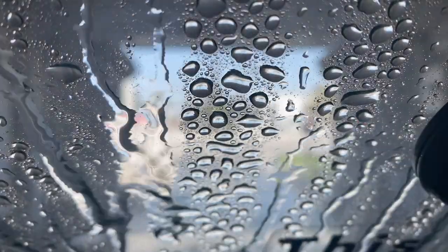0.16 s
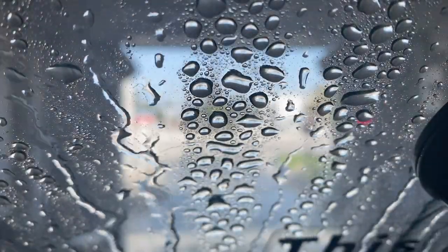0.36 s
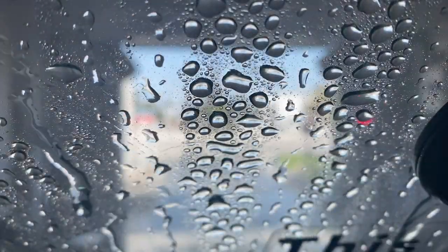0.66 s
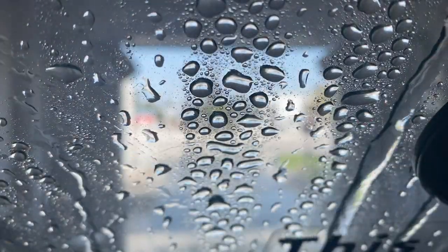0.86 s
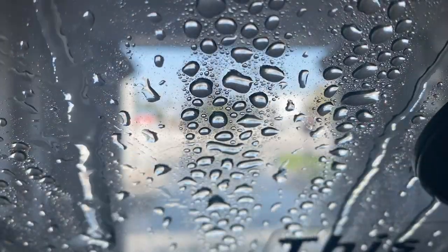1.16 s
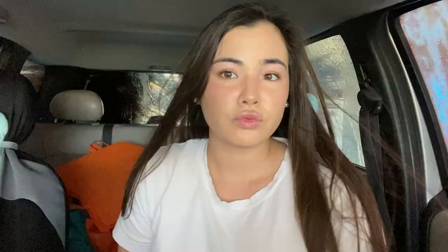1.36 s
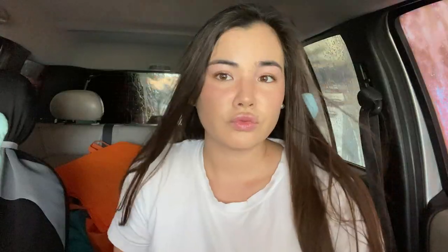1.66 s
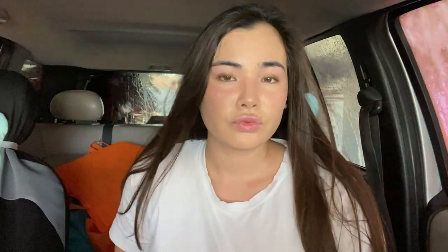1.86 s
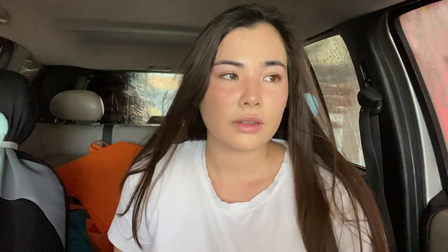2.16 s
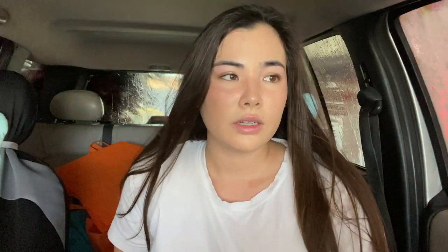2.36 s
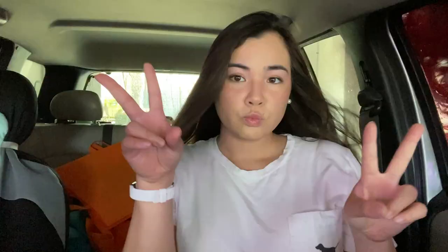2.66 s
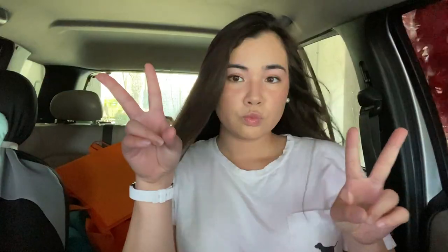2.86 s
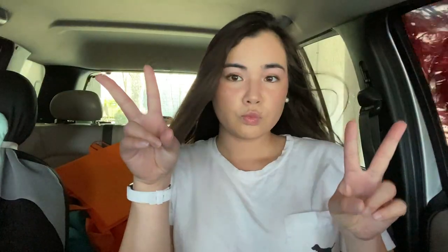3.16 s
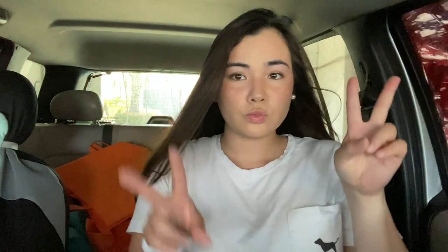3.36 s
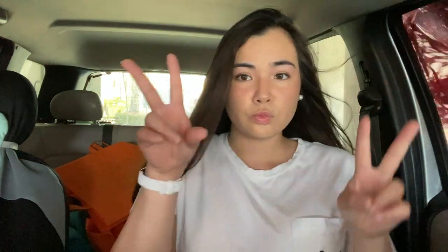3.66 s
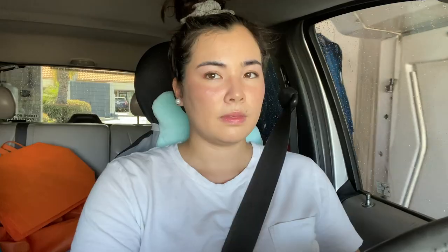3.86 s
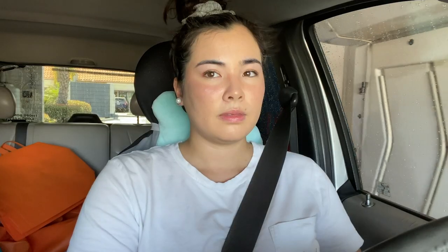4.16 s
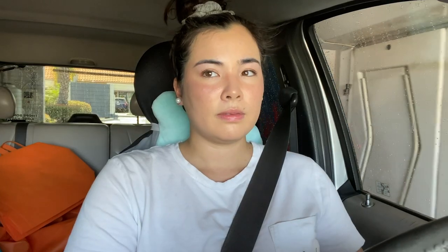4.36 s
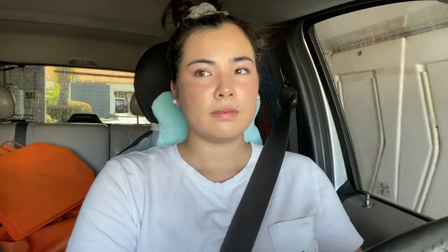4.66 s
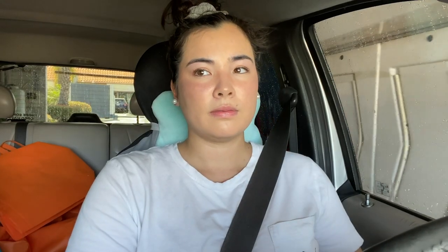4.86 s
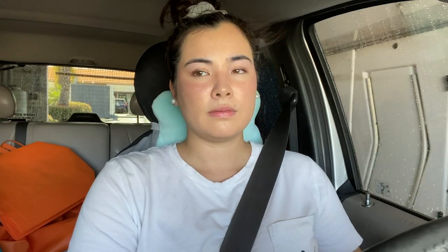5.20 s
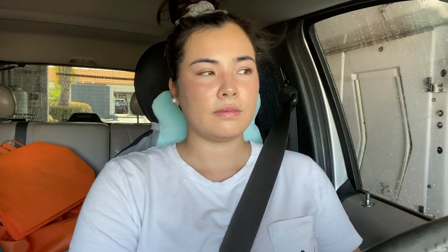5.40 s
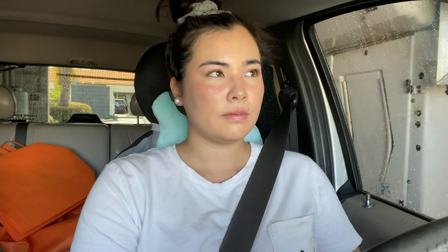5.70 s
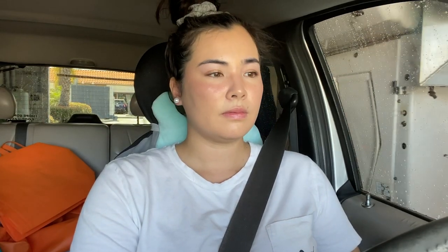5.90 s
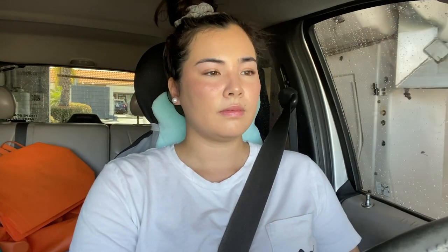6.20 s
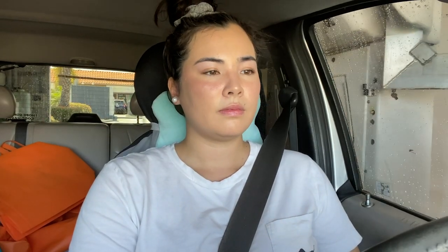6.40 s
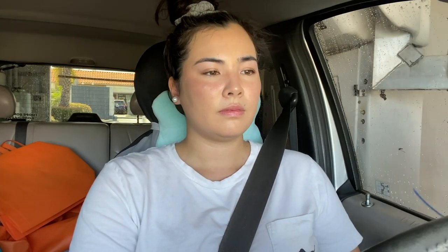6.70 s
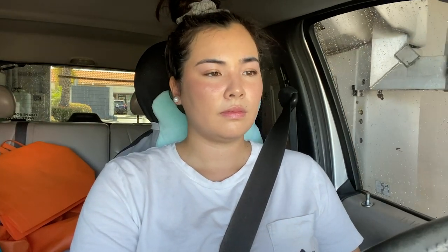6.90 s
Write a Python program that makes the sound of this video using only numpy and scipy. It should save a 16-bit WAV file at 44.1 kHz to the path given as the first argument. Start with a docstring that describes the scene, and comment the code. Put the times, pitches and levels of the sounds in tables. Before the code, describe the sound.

Inside a car in an automatic wash: water sputters on the windscreen, foam drums, a wet brush slaps, then motors hum and whine.

```python
"""Inside a car in an automatic car wash, four stages follow each other abruptly.
Water trickles and sputters on the windscreen: shaped noise pulsed by the nozzle, over a rumbling bay.
Foam drums on the panels and spatters on the glass: grainy noise, noise bursts and tiny ringing droplets.
A wet brush slaps the side window with noise bursts and shakes the body with short low waves.
Then only the motors are heard: beating sine waves, ringing noise, a howl and a whine."""
import sys
import numpy as np
from scipy import signal
from scipy.fft import rfft, irfft
from scipy.io import wavfile
from scipy.ndimage import uniform_filter1d

SR = 44100
rng = np.random.default_rng(int(sys.argv[2]) if len(sys.argv) > 2 else 0)


def log_audio(samples):
    """Write samples as a 16-bit WAV file to the path given in sys.argv[1]."""
    # one column per channel
    frames = np.atleast_2d(samples).T
    # limit to full scale, then quantise
    limited = np.clip(frames, -1, 1)
    pcm = np.round(limited * 32767).astype(np.int16)
    wavfile.write(sys.argv[1], SR, pcm)


N = 310464
TIME = np.arange(N) / SR
FREQ = np.maximum(np.arange(N // 2 + 1) * SR / N, 1)  # in Hz; at least 1 to avoid dividing by zero

# when each later stage begins, in seconds
FOAM_S, BRUSH_S, MOTORS_S = 1.428, 2.729, 3.858

# colour of each kind of noise, before its own level changes: pitch_hz, level_db_per_hz
BAY_COLOUR = [(25, -67), (40, -51.5), (58, -43), (120, -49), (160, -53), (210, -57), (400, -54.5),
              (650, -64.5), (900, -66.5), (1300, -72.5), (1900, -74.5), (3000, -84.5), (4800, -82.5),
              (15000, -100.5)]
FOAM_COLOUR = [(25, -58), (55, -42.5), (130, -44), (200, -38.5), (290, -48), (400, -40.5), (600, -50),
               (900, -49.5), (1150, -55.5), (1600, -61.5), (2700, -63.5), (4500, -67.5), (8000, -77),
               (10500, -86), (15000, -94)]
BRUSH_COLOUR = [(25, -66.5), (40, -39), (57, -35), (115, -38), (200, -43.5), (380, -46), (600, -50.5),
                (900, -51.5), (1400, -54.5), (2500, -60), (4700, -60.5), (6300, -69.5), (10500, -78),
                (15000, -89)]
DRONE_COLOUR = [(25, -61), (40, -48), (52, -45), (85, -42.5), (140, -48.5), (210, -46), (280, -47.5),
                (380, -46), (650, -57.5), (950, -59), (1450, -66.5), (2500, -72), (4500, -81),
                (6200, -90.5), (8200, -92), (10700, -108), (12800, -102), (15000, -106)]
SPLASH_COLOUR = [(1000, -65.5), (2000, -74), (4000, -75), (7000, -75.5), (11000, -79.5), (15000, -78.5)]

# how alike left and right are, below the top treble: pitch_hz, correlation (-1 to 1)
FRONT_LIKENESS = [(60, 1), (130, 0.8), (290, 0.74), (640, -0.1), (1600, -0.26), (2100, 0.2), (4000, 0.3),
                  (6820, 0.23)]
FOAM_LIKENESS = [(60, 0.94), (150, 0.54), (400, 0.31), (600, -0.35), (900, 0.26), (1150, -0.24),
                 (2100, -0.19), (6800, -0.11)]
BRUSH_LIKENESS = [(60, 0.86), (150, 0.47), (290, 0.37), (540, -0.41), (950, -0.44), (1200, -0.72),
                  (1700, -0.37), (2000, 0.065), (2450, 0.65), (3500, -0.41), (6800, 0.072)]
MOTOR_LIKENESS = [(60, 0.97), (250, 0.77), (510, -0.29), (850, -0.14), (1300, -0.31), (1550, -0.54),
                  (1760, -0.075), (1930, 0.15), (3300, -0.11), (6800, 0.14)]
# left-right balance added in the cabin: pitch_hz, left_minus_right_db
CABIN_BALANCE = [(60, -1.5), (110, -3), (200, -3.5), (380, -3), (700, -2.5), (1290, -0.5), (2380, 0.5),
                 (4400, -0.5), (8120, -0.5), (15000, -1)]

# motor hum above the shaft rate: multiple (of the shaft rate), level_db (before it wanders)
HUM_OVERTONES = [(2, -30), (3, -33.5)]
# first motor's hum over time: time_s, level_db
HUM_LEVEL = [(3.86, -32), (4.33, -21), (4.62, -23.5), (4.95, -27), (5.42, -27), (5.62, -21.5), (5.95, -28),
             (6.23, -23.5), (7.04, -24.5)]
# narrow resonances of the running machinery: pitch_hz, width_hz, level_db (before it wanders)
MACHINE_RINGS = [(209.5, 55, -32.5), (481, 133, -30), (1950, 140, -46), (2067, 80, -49.5),
                 (4870, 300, -62.5)]
# rises and dips of the whine: crest_s, change_db
SURGES = [(4.58, 5.5), (5.03, 6), (5.28, -1), (5.69, 7), (5.98, 3), (6.17, 5.5), (6.67, 4)]
# rises of the machinery's howl: crest_s, change_db
HOWLS = [(4.0, 5.5), (4.29, 6), (4.71, 4), (5.09, 13), (5.77, 5), (6.7, 7)]

# panels and fittings that ring under the rinse: pitch_hz, width_hz, level_db
BAY_RINGS = [(209.2, 20, -36), (902, 110, -45), (1747, 110, -52.5), (4000, 110, -57), (4800, 190, -57)]
# loose water that gushes over the windscreen: crest_s, level_db, rise_s, fall_s
GUSHES = [(.918, 0.5, .004, .015), (.946, 1.5, .012, .007), (1.185, -8.5, 0.011, 0.055),
          (1.27, -1, 0.036, 0.069)]
# single drops and knocks on the car: start_s, level_db (before the ring's envelope), pitch_hz, width_hz, decay_s
DROPS = [(0.469, -13.5, 254, 50, 0.017), (0.634, -20.5, 350, 181, 0.02), (0.676, -20, 3530, 1150, 0.003),
         (.783, -24.5, 1800, 600, 0.0092), (0.782, -6.5, 113.6, 29.8, 0.032),
         (.914, -31, 4300, 2500, 0.008), (0.9375, -27.5, 2320, 300, .008), (.946, -36, 3500, 1200, .005),
         (.947, -29, 1870, 70, 0.017), (4.2018, -22, 7200, 5200, 0.0066), (4.202, -19, 2230, 1000, 0.0067),
         (5.445, -41, 14000, 2500, 0.0072), (5.639, -44, 12900, 4000, 0.0056),
         (6.265, -46, 12900, 800, .012), (6.97, -47, 13000, 4000, .006)]

# moments when the water swings off the glass: time_s, change_db
LULLS = [(1.783, -12), (1.884, -7), (1.985, -8.5), (2.216, -6.5), (2.347, -8), (2.53, -7.5), (2.675, -15),
         (2.886, -8.5), (3.008, -6.5), (3.075, -7), (3.401, -5.5), (3.562, -10.5), (3.718, -12.5)]
# modes of the wet side window: pitch_hz, width_hz, boost_db (before an overall trim)
WINDOW_MODES = [(1930, 39, 2), (2210, 39, -2.5), (2490, 55, 3), (2890, 50, 1.5), (3270, 44, 4),
                (4360, 290, 2)]
# clots of foam that thump the panels: crest_s, change_db
THUMPS = [(1.434, 1.5), (1.504, -0.5), (1.571, 2.5), (1.634, 2), (1.667, 1.5), (1.708, 2.5), (1.766, 4.5),
          (1.809, 1.5), (1.866, 6), (1.924, 2), (1.96, 2.5), (2.019, 3.5), (2.1, 3), (2.172, 8),
          (2.257, 5.5), (2.328, 6), (2.388, -1), (2.449, 1.5), (2.532, 6), (2.576, 8.5), (2.64, 3.5),
          (2.71, 4.5)]
# narrow ring of the panels under the foam: pitch_hz, width_hz, level_db (before it drums)
PANEL_RINGS = [(398, 48, -25.5), (700, 24, -32.5)]
# gobs of foam that spatter on the glass: crest_s, level_db, centre_hz
SPATTERS = [(1.431, -27.5, 3000), (1.488, -25, 3600), (1.539, -25.5, 3370), (1.595, -26, 3200),
            (1.633, -28, 3300), (1.698, -26, 2900), (1.721, -24.5, 3100), (1.825, -25.5, 2900),
            (1.865, -29, 2700), (1.9, -23.5, 3400), (1.935, -35, 2900), (2.021, -23, 3370),
            (2.052, -22.5, 3470), (2.104, -23, 3120), (2.137, -23, 2200), (2.165, -20, 3030),
            (2.247, -27, 3000), (2.297, -23.5, 3580), (2.359, -26.5, 3800), (2.438, -26, 2800),
            (2.471, -26.5, 3900), (2.579, -18, 3300), (2.621, -25, 3500), (2.701, -24, 3600)]
# the jet of foam first strikes the car: crest_s, level_db, centre_hz
JET_STRIKE = [(1.4288, -15, 520)]
# strips of the brush that slap the glass: crest_s, level_db (before a small trim), centre_hz
SLAPS = [(2.7305, -21, 3200), (2.738, -19, 3000), (2.751, -16, 2500), (2.8515, -16.5, 2880),
         (2.895, -19, 2920), (2.903, -16, 2720), (2.923, -21.5, 2500), (2.952, -27, 2100),
         (3.0162, -19, 3020), (3.1085, -15.5, 3470), (3.1165, -21, 2400), (3.145, -20, 3100),
         (3.179, -19, 3100), (3.204, -18, 3000), (3.226, -19, 4000), (3.246, -10.5, 2170),
         (3.277, -11, 2600), (3.285, -15.5, 3200), (3.298, -25, 2880), (3.337, -26, 2900),
         (3.37, -18, 3000), (3.378, -11.5, 2930), (3.4523, -13, 2600), (3.4677, -15, 2500),
         (3.48, -19, 3100), (3.501, -19, 2600), (3.5196, -14, 3000), (3.583, -16.5, 2900),
         (3.59, -19, 2500), (3.609, -29, 3900), (3.638, -21, 2200), (3.6694, -20, 3300), (3.68, -21, 3700),
         (3.702, -14.5, 1900), (3.733, -18.5, 3300), (3.798, -20, 3200), (3.832, -19.5, 2780)]
# the brush bumps the body of the car: crest_s, level_db, pitch_hz
BUMPS = [(2.744, -17.5, 96), (2.881, -12.5, 88), (2.953, -16, 110), (3.006, -17.5, 82), (3.045, -15.5, 90),
         (3.275, -18.5, 90), (3.309, -13.5, 72), (3.479, -13, 87.6), (3.534, -15.5, 102),
         (3.603, -15.5, 101), (3.791, -20, 80), (3.829, -15.5, 90)]

# two motors run at nearly the same speed, so their hum beats; the second grows louder
SHAFT_HZ, BEAT_HZ, BEAT_CREST_S = 57.9, 3.12, 6.23  # at the crest both are in step
SECOND_MOTOR_DB, SECOND_MOTOR_DB_PER_S = -6.5, 2.5  # compared with the first, at that crest
WHINE_HZ, WHINE_WIDTH_HZ, WHINE_DB = 1692, 62, -43  # level before surges
WHINE_TONE_DB, WHINE_WAVER = -46, 0.0111  # thin tone at its core; spread of its pitch as a share
HOWL_HZ, HOWL_WIDTH_HZ, HOWL_DB = 528.7, 20, -35.5  # level before rises
# the nozzle's spray moves off the windscreen and leaves a trickle
NOZZLE_DB, NOZZLE_LEAVES_S, NOZZLE_FADE_DB_PER_S, TRICKLE_DB = -9.5, 0.27, 49, -14.5
SPUTTER_HZ, SPUTTER_DEPTH, SPURT_S = 25, 0.61, 0.21  # SPURT_S is the crest of one spurt
# steady force for the foam; the brush presses in up to its deepest point and eases off
FOAM_FORCE_DB, BRUSH_FORCE_DB, BRUSH_DEEPEST_S, BRUSH_EASE_DB_PER_S = 0.5, 1.03, 3.59, 2
# half widths of level changes, in seconds
SURGE_S, HOWL_S, FOAM_LULL_S, BRUSH_LULL_S, THUMP_S, BUMP_S = 0.062, 0.096, 0.014, 0.015, 0.013, 0.0084
BODY_HZ, BODY_WIDTH_HZ, BODY_DB = 111.7, 15, -26  # boom of the cabin under the brush, before its trim
GLASS_TOP_HZ, TOP_HZ = 6800, 15600  # splashes are muffled above the first; all sound is cut above the second
QUADRATURE = np.array([[0], [np.pi / 2]])  # a quarter turn makes two unrelated copies, which ports() blends


def undb(db):
    """Turn decibels into gain."""
    return 10 ** (np.asarray(db) / 20)


def unit(x):
    """Scale to an average strength (rms) of 1."""
    return x / np.sqrt(np.mean(x ** 2))


def noise():
    """Unrelated white noise left and right."""
    return rng.standard_normal((2, N))


def walk(rate):
    """Random levels held for 1 / rate seconds and smoothed twice; rms 1."""
    hold = int(SR / rate)
    steps = np.repeat(rng.standard_normal(N // hold + 1), hold)
    return unit(uniform_filter1d(uniform_filter1d(steps, hold), hold)[:N])


def swells(table, half_width_s):
    """Smooth rises or dips of level in dB, one for each row."""
    return sum(db * np.exp(-((TIME - s) / half_width_s) ** 2) for s, db in table)


def stage(start, end, fade_s):
    """Gain that is 1 between two times, with a short fade at each."""
    opening = np.clip((TIME - start) / fade_s + .5, 0, 1)
    closing = np.clip((end - TIME) / fade_s + .5, 0, 1)
    return opening * closing


def over_hz(table):
    """Spread a table of pitch and value along the frequency axis."""
    hz, value = np.transpose(table)
    return np.interp(np.log(FREQ), np.log(hz), value)


def colour(x, table):
    """Colour white sound of rms 1 so that each impact rings only after it lands."""
    gain = undb(over_hz(table)) * np.sqrt(SR / 2) * np.minimum(FREQ / 20, 1)
    # folding the cepstrum forward makes the filter causal
    cepstrum = irfft(np.log(gain), N)
    cepstrum[1:N // 2] *= 2
    cepstrum[N // 2 + 1:] = 0
    return irfft(rfft(x) * np.exp(rfft(cepstrum)), N)


def split(x, hz):
    """The parts below and above a frequency."""
    low = irfft(rfft(x) / (1 + (FREQ / hz) ** 4), N)
    return low, x - low


def resonance(hz, width_hz):
    """Noise in one steep resonance; rms 1."""
    offset = (FREQ - hz ** 2 / FREQ) / (2 * width_hz)
    return unit(irfft(rfft(noise()) / (1 + offset ** 2) ** 2, N))


def patter(per_s, scatter_db, mist_db):
    """Droplet impacts of uneven size over a fine mist; rms 1."""
    lands = rng.random(N) < per_s / SR
    size = undb(scatter_db * np.minimum(rng.standard_normal(N), 1.5))
    impacts = unit(np.sign(noise()) * lands * size)
    return unit(impacts + undb(mist_db) * noise())


def patchy(x, patchy_db, rate):
    """Water lands on different spots, so half-octave bands above the bass flicker independently."""
    spectrum = rfft(x)
    place = np.clip(2 * np.log2(FREQ / 350), 0, 10)
    bass, *bands = (irfft(spectrum * np.maximum(1 - abs(place - k), 0), N) for k in range(11))
    return bass + sum(band * unit(undb(patchy_db * walk(rate))) for band in bands)


def reflect(x, echo_db, spread_s, count=60):
    """Windows and roof return each sound within milliseconds and ripple its spectrum."""
    response = np.zeros((2, N))
    for side in response:
        arrives = (SR * (.0008 + spread_s * rng.random(count))).astype(int)
        side[arrives] = rng.choice([-1, 1], count) * undb(echo_db) / np.sqrt(count)
    above_bass = FREQ / (FREQ + 1200)
    level = np.sqrt(1 + (above_bass * undb(echo_db)) ** 2)  # the loudness that echoes add
    return irfft(rfft(x) * (1 + above_bass * rfft(response)) / level, N)


def window(x):
    """The glass lifts the hiss of the water at its modes."""
    boost_db = sum(db / (1 + (2 * (FREQ - hz) / width) ** 2) for hz, width, db in WINDOW_MODES)
    return irfft(rfft(x) * undb(boost_db - 0.8), N)


def splashes(table, octaves, rise_s, fall_s, size=8192):
    """Short bursts of water noise, each in a band around its own centre."""
    out = np.zeros((2, N))
    age = (np.arange(size) - size // 2) / SR
    freq = np.maximum(np.arange(size // 2 + 1) * SR / size, 1)
    envelope = np.exp(np.minimum(age / rise_s, -age / fall_s))
    muffle = 1 / np.sqrt(1 + (freq / GLASS_TOP_HZ) ** 10)
    for s, db, hz in table:
        band = np.exp(-(np.log2(freq / hz) / octaves) ** 2 / 2) * muffle
        burst = unit(irfft(rfft(rng.standard_normal((2, size))) * band))
        start = int(s * SR) - size // 2
        out[:, start:start + size] += undb(db) * envelope * burst
    return out


def pings(per_s, low_hz, high_hz, cycles, scatter_db, size=512):
    """Single droplets tick on the glass, each ringing for a few cycles at its own pitch; rms 1."""
    out = np.zeros((2, N + size))
    age = np.arange(size) / SR
    for when, pitch, weight, left, right in rng.random((int(per_s * N / SR), 5)):
        turns = low_hz * (high_hz / low_hz) ** pitch * age
        wave = np.sin(2 * np.pi * (turns + np.array([[left], [right]])))
        ring = wave * np.exp(-turns / cycles) * (1 - np.exp(-turns)) ** 2
        start = int(when * N)
        out[:, start:start + size] += undb(scatter_db * weight) * ring
    return unit(out[:, :N])


def ports(x, likeness, lag_ms):
    """Left and right: their likeness varies with pitch; in the top treble the right is the left, delayed and
    inverted."""
    direct = np.clip((FREQ - 6200) / 1800, 0, 1)
    delayed = -.96 * np.exp(-2j * np.pi * FREQ * lag_ms / 1000)
    shared = (1 - direct) * np.clip(over_hz(likeness), -1, 1) + direct * delayed
    separate = np.sqrt(1 - np.minimum(abs(shared), 1) ** 2)
    left, other = rfft(x)
    return irfft(np.array([left, shared * left + separate * other]), N)


def motor_hum():
    """Two motors at slightly different speeds beat on a wavering shaft rate."""
    angle = 2 * np.pi * np.cumsum(SHAFT_HZ * (1 + 0.00923 * walk(9))) / SR
    since = TIME - BEAT_CREST_S
    slip = 2 * np.pi * BEAT_HZ * since
    second_gain = undb(SECOND_MOTOR_DB + SECOND_MOTOR_DB_PER_S * since)
    pair = np.sin(angle + QUADRATURE) + second_gain * np.sin(angle - slip + QUADRATURE)
    hum = undb(np.interp(TIME, *np.transpose(HUM_LEVEL))) * pair
    for multiple, db in HUM_OVERTONES:
        hum = hum + undb(db + 4.5 * walk(13)) * np.sin(multiple * angle + QUADRATURE)
    return np.sqrt(2) * hum


def machine_whine():
    """A thin wavering tone inside a narrow band of noise surges now and then."""
    angle = 2 * np.pi * np.cumsum(WHINE_HZ * (1 + WHINE_WAVER * walk(70))) / SR
    tone = np.sqrt(2) * np.sin(angle + QUADRATURE)
    breath = resonance(WHINE_HZ, WHINE_WIDTH_HZ)
    return undb(swells(SURGES, SURGE_S)) * (undb(WHINE_TONE_DB) * tone + undb(WHINE_DB) * breath)


def motors():
    """Motors hum over the wash of the bay while the machinery rings, howls and whines."""
    rings = sum(undb(db + 1.7 * walk(11)) * resonance(hz, width) for hz, width, db in MACHINE_RINGS)
    howl = undb(HOWL_DB + swells(HOWLS, HOWL_S)) * resonance(HOWL_HZ, HOWL_WIDTH_HZ)
    wash = reflect(colour(noise(), DRONE_COLOUR), echo_db=-7.5, spread_s=.02)
    return wash * undb(-.5 + 0.17 * walk(5.6)) + motor_hum() + rings + machine_whine() + howl


def drops():
    """Each drop or knock is a short burst of ringing noise; a narrow ring takes longer to build up."""
    out = 0
    for s, db, hz, width, decay in DROPS:
        age = np.maximum(TIME - s, 0)
        build_up = 1 - np.exp(-2 * np.pi * width * age)
        out = out + undb(db) * resonance(hz, width) * build_up * np.exp(-age / decay) / 2
    return out


def rinse():
    """The bay rumbles outside while a sputtering nozzle and loose splashes wet the windscreen."""
    rumble = colour(patter(per_s=1500, scatter_db=2.5, mist_db=3.0), BAY_COLOUR)
    bay = rumble * undb(-2.5 + 0.25 * walk(15.1))
    rings = sum(undb(db) * resonance(hz, width) for hz, width, db in BAY_RINGS)
    spurts = 1 + SPUTTER_DEPTH * np.cos(2 * np.pi * SPUTTER_HZ * (TIME - SPURT_S))
    fade_db = NOZZLE_FADE_DB_PER_S * np.maximum(TIME - NOZZLE_LEAVES_S, 0)
    nozzle = spurts * undb(NOZZLE_DB - fade_db)
    gushes = sum(undb(db) * np.exp(np.minimum((TIME - s) / rise, (s - TIME) / fall))
                 for s, db, rise, fall in GUSHES)
    flow = np.sqrt(nozzle ** 2 + gushes ** 2 + undb(TRICKLE_DB) ** 2)
    water = colour(patter(per_s=2500, scatter_db=0.5, mist_db=-3.0), SPLASH_COLOUR)
    splash = split(water, 1060)[1] * flow
    return (bay + rings + splash) * undb(np.array([[1.2], [-.8]]))  # trim of the two channels


def foam():
    """Clots of foam drum on the panels and ring them; gobs spatter and hiss on the glass."""
    wet_db = FOAM_FORCE_DB + swells(LULLS, FOAM_LULL_S)
    clots_db = 1.04 * walk(130)
    spray = colour(patter(per_s=1500, scatter_db=1.0, mist_db=0.5), FOAM_COLOUR)
    spray = patchy(spray, patchy_db=3.5, rate=90)
    drum, hiss = split(reflect(spray, echo_db=-1.0, spread_s=.02), 1900)
    panels = sum(undb(db + 0.6 * walk(24.0)) * resonance(hz, width) for hz, width, db in PANEL_RINGS)
    drum_db = 0.32 * wet_db + 0.42 * clots_db + swells(THUMPS, THUMP_S) - 3.5
    droplets = undb(-38.0) * pings(per_s=350, low_hz=1110, high_hz=4980, cycles=5.4, scatter_db=16.0)
    gobs = splashes(SPATTERS, octaves=0.66, rise_s=0.0035, fall_s=0.012)
    strike = splashes(JET_STRIKE, octaves=0.93, rise_s=0.0003, fall_s=0.005)
    on_glass = (hiss * undb(clots_db - 0.35) + droplets) * undb(wet_db) + gobs
    return strike + (drum + panels) * undb(drum_db) + window(on_glass)


def bumps():
    """Each bump rocks the body for a cycle or two."""
    out = 0
    for s, db, hz in BUMPS:
        wave = np.cos(2 * np.pi * (hz * (TIME - s) + rng.random()))
        out = out + undb(db) * wave * np.exp(-((TIME - s) / BUMP_S) ** 2)
    return np.sqrt(2) * out


def brush():
    """Wet strips slap the side window, fling droplets in crackling flurries and make the body boom."""
    pressure_db = BRUSH_FORCE_DB - BRUSH_EASE_DB_PER_S * abs(TIME - BRUSH_DEEPEST_S)
    wet_db = pressure_db + swells(LULLS, BRUSH_LULL_S)
    flurry_db = 1.4 * walk(200)
    splatter = colour(patter(per_s=1400, scatter_db=2.0, mist_db=-0.5), BRUSH_COLOUR)
    splatter = patchy(splatter, patchy_db=2.2, rate=120)
    boom, crackle = split(reflect(splatter, echo_db=-3.5, spread_s=.02), 1120)
    boom = boom + undb(BODY_DB) * resonance(BODY_HZ, BODY_WIDTH_HZ)
    thud, slosh = split(boom, 340)
    droplets = undb(-31.5) * pings(per_s=360, low_hz=1690, high_hz=5000, cycles=4.5, scatter_db=16.0)
    slaps = undb(0.1) * splashes(SLAPS, octaves=0.85, rise_s=0.0002, fall_s=0.0058)
    body = thud * undb(-1.5) + bumps() + slosh * undb(0.33 * wet_db + 1.2)
    on_glass = (crackle * undb(-1.0) + droplets) * undb(wet_db + flurry_db) + slaps
    return body + window(on_glass)


def scene():
    """The four stages in turn, heard first at the windscreen and then in the middle of the cabin."""
    ticks = drops()
    front = (rinse() + ticks) * stage(-1, FOAM_S, 0.0018)
    stages = [(foam() * stage(FOAM_S, BRUSH_S, .002), FOAM_LIKENESS),
              (brush() * stage(BRUSH_S, MOTORS_S, 0.0078), BRUSH_LIKENESS),
              ((motors() + ticks) * stage(MOTORS_S, 10, 0.0099), MOTOR_LIKENESS)]
    cabin = sum(ports(sound, likeness, lag_ms=0.19) for sound, likeness in stages)
    balance_db = over_hz(CABIN_BALANCE) * np.array([[.5], [-.5]])
    cabin = irfft(rfft(cabin) * undb(balance_db), N)
    return ports(front, FRONT_LIKENESS, lag_ms=0.223) + cabin


def record(dry):
    """Round the highest peaks, then cut the top treble steeply."""
    rounded = np.tanh(0.89 * dry) / 0.91
    top_cut = signal.ellip(12, .2, 80, TOP_HZ, fs=SR, output="sos")
    return signal.sosfilt(top_cut, rounded)


dry = scene()
out = record(dry)
log_audio(out)
```